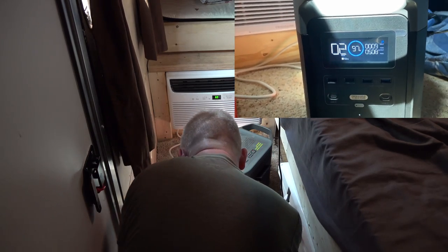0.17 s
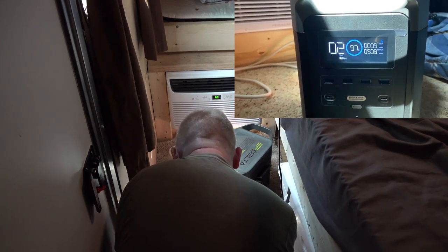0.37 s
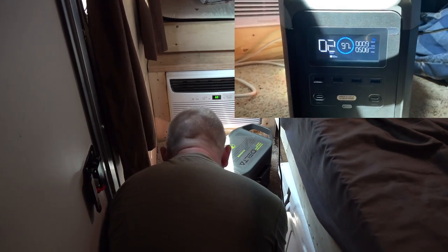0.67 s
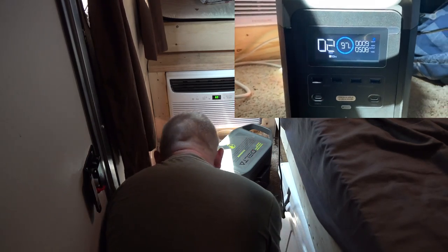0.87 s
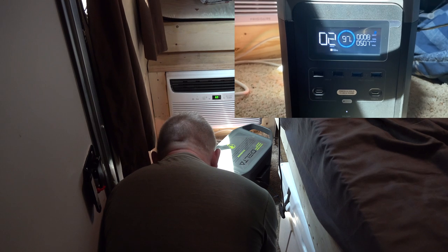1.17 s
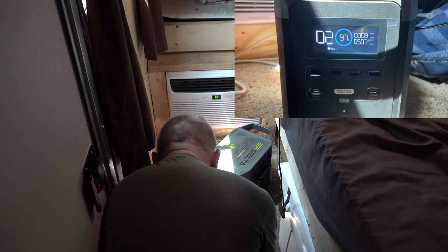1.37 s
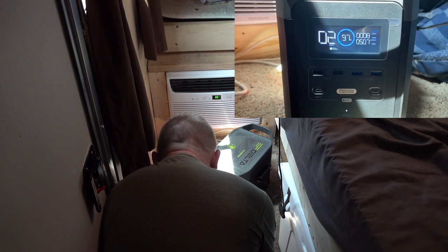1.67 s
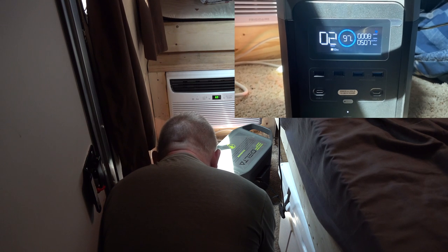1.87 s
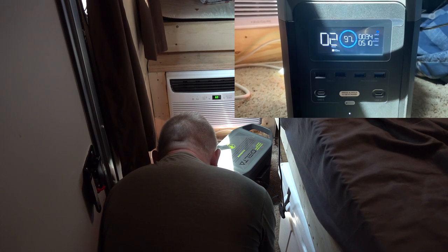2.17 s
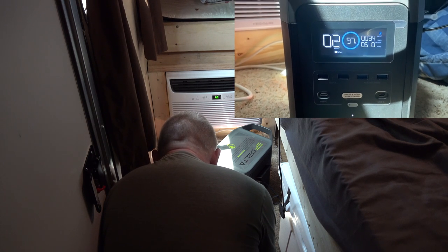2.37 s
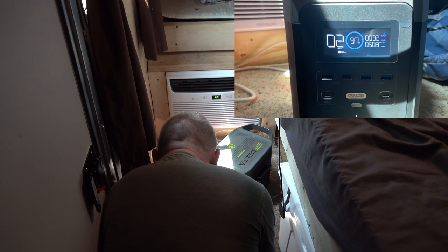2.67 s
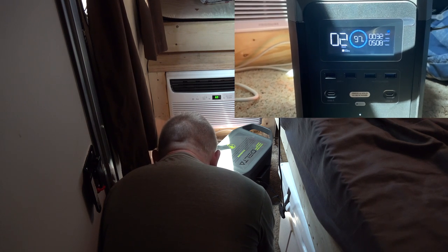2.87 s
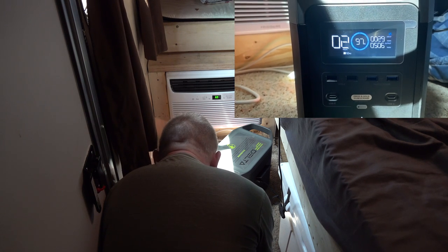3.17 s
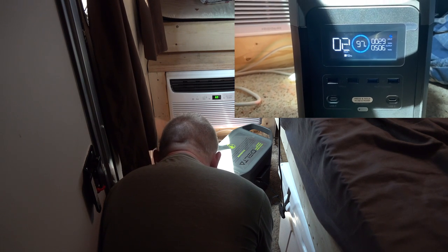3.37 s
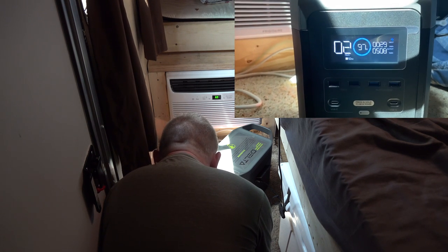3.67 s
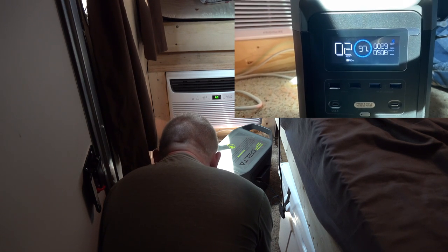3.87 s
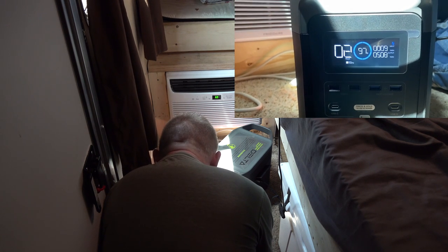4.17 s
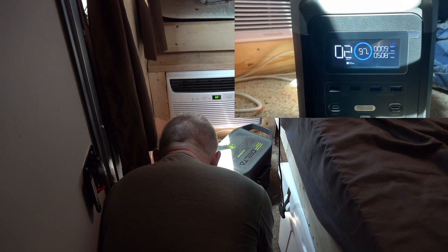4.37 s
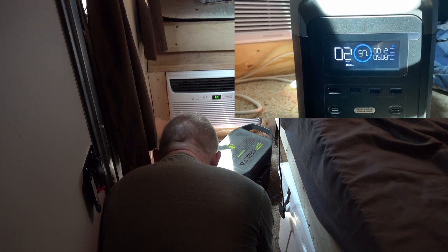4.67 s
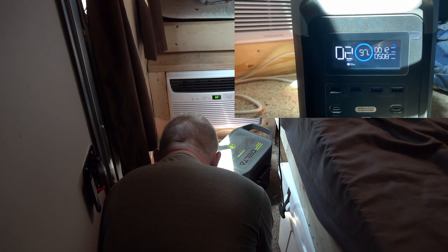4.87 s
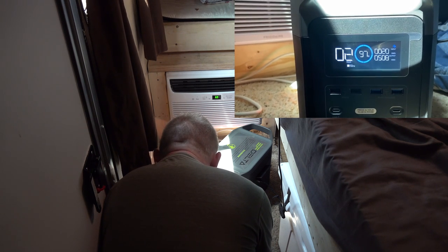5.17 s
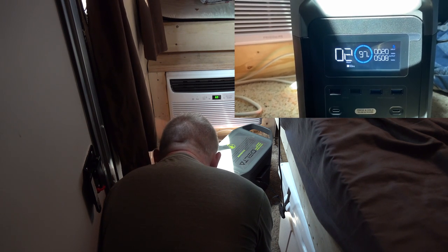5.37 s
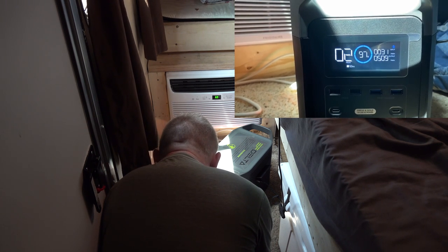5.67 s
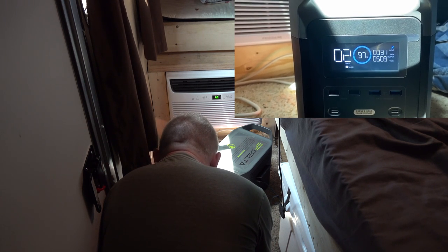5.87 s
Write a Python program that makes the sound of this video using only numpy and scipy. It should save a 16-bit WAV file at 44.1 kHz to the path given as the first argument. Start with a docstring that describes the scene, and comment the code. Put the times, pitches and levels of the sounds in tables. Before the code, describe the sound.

A wall air conditioner runs steadily in a small camper, blower air rushing over a low boom with humming, buzzing motor tones.

```python
"""Air conditioner in a small camper

A wall air conditioner runs steadily, heard from a phone a couple of metres away. Filtered noise makes the
blower air that rushes through the grille and booms low down; fluttering sines make the tones of fan,
compressor, mains hum and thin whines. One faint tick comes from the plastic casing. A faint deep rumble,
swelling with two jolts of the phone early on, dies away after two seconds."""
import sys
import numpy as np
from scipy import signal
from scipy.fft import rfft, irfft
from scipy.io import wavfile
from scipy.ndimage import uniform_filter1d

SR = 44100
rng = np.random.default_rng(int(sys.argv[2]) if len(sys.argv) > 2 else 0)


def to_wav(sig):
    """Store sig (one row per channel, or 1-D mono) as 16-bit WAV at the path in sys.argv[1].

    Samples outside -1..1 are clipped; the rate is SR.
    """
    pcm = np.clip(np.atleast_2d(sig), -1, 1) * 32767
    pcm = np.round(pcm).astype(np.int16)
    wavfile.write(sys.argv[1], SR, pcm.T)  # frames by channels


N = 266319  # length in samples, about 6 s

TIME = np.arange(N) / SR  # s
FREQ = np.maximum(np.arange(N // 2 + 1) * SR / N, 1)  # Hz, kept above zero for the logarithm


def undb(db):
    """Decibels to gain."""
    return 10 ** (np.asarray(db) / 20)


def curve(rows):
    """A table of (s, value) joined by straight lines over time."""
    return np.interp(TIME, *np.transpose(rows))


def spectrum(rows):
    """A table of (Hz, value) joined on a log-frequency axis."""
    hz, value = np.transpose(rows)
    return np.interp(np.log(FREQ), np.log(hz), value)


def shape(x, gain):
    """Filter with one gain per frequency."""
    return irfft(rfft(x) * gain, N)


def noise(gain):
    """Noise whose amplitude per root Hz is gain."""
    return shape(rng.standard_normal(N), gain) * np.sqrt(SR / 2)


def below(hz, order):
    """Gain of a smooth low-pass."""
    return 1 / np.sqrt(1 + (FREQ / hz) ** (2 * order))


def walk(rate):
    """Smooth random motion with unit spread, holding rates up to about rate Hz."""
    x = noise(below(rate, order=3))
    return x / x.std()


def turns(hz, drift):
    """Phase of a rotation whose speed wanders by the share drift."""
    speed_hz = hz * (1 + drift * walk(0.95))
    return 2 * np.pi * np.cumsum(speed_hz) / SR


def tone(phase, db, flutter, rate):
    """One partial at an RMS level of db; moving air makes its strength and phase flutter."""
    path = 1 + flutter * (walk(rate) + 1j * walk(rate)) / np.sqrt(2)
    start = rng.uniform(0, 2 * np.pi)
    amplitude = undb(db) * np.sqrt(2 / (1 + flutter ** 2))  # flutter leaves the level alone
    return amplitude * np.real(path * np.exp(1j * (phase + start)))


def machine(rows, phase, flutter, rate):
    """Partials locked to whole multiples of one rotation."""
    return sum(tone(round(multiple) * phase, db, flutter, rate) for multiple, db in rows)


def rumble(jolt_db, corner_hz=10):
    """Mostly subsonic rumble: it swells with each jolt of the phone and dies away after two seconds."""
    # jolts of the phone in the hand: peak_s, level_db, half_length_s
    jolt_table = [(.17, -31.5, 0.12), (.6, -30, 0.13)]
    steady_db, fade_s, settle_s = -43.5, 2.0, .22  # a faint steady rumble that dies away after two seconds
    x = noise(below(corner_hz, order=2) * below(34, order=4) * (1 - below(6, order=3)))
    x = x / np.sqrt(uniform_filter1d(x ** 2, size=SR // 4))  # even out the level
    held = undb(steady_db) * np.exp(-np.maximum(TIME - fade_s, 0) / settle_s)
    jolts = sum(undb(db + jolt_db) * np.exp(-((TIME - peak_s) / half_s) ** 2)
                for peak_s, db, half_s in jolt_table)
    return x * np.hypot(held, jolts)


def ticks(decay_s=.004):
    """A short, damped noise burst around one resonance of the plastic casing."""
    # faint ticks: start_s, level_db, resonance_hz
    tick_table = [(.634, -39, 1950)]
    out = np.zeros(N)
    for start_s, db, hz in tick_table:
        ring = noise(1 / (1 + ((FREQ - hz) / (.25 * hz)) ** 2))
        envelope = np.exp(-np.abs(TIME - start_s) / decay_s) * (TIME >= start_s)
        out += ring / ring.std() * undb(db) * envelope
    return out


def reflections(depth=0.13, decay_s=0.013):
    """Gain of dense echoes from the close walls, which comb the treble finely."""
    echoes = rng.standard_normal(N) * np.exp(-TIME / decay_s) * (TIME > .004)
    comb = rfft(echoes) / np.sqrt(np.sum(echoes ** 2))
    share = depth * (1 - below(1350, order=4))
    return np.abs(1 + share * comb) / np.sqrt(1 + share ** 2)


def cabin_db():
    """Peaks and dips in dB that the duct and the close walls give to the rush."""
    # resonances (+) and cancellations (-) of duct and cabin: centre_hz, width_hz, gain_db
    cabin = [(81.3, 19, -12), (138.4, 8, -1.5), (158.6, 15.5, 9), (184, 14, -4.5), (198, 7.3, 2),
             (216.5, 8.4, -4.5), (291, 29, 3.5), (335, 20, -1), (361, 11, 3), (389, 16, -5.5),
             (418, 22, 2.5), (482, 44, -3), (546, 54, 3), (657, 30, 2), (715, 28, -9), (789, 87, 5),
             (1102, 13, -2.5), (1116, 30, 5.5), (1392, 74, 4), (1830, 400, 4), (2240, 106, -1.7),
             (2431, 290, 5), (2740, 261, -3.0), (3825, 180, 3.0), (4515, 217, 1.7), (6160, 680, 2),
             (8660, 460, 2.5), (9900, 596, 2)]
    return sum(db / (1 + (2 * (FREQ - hz) / width_hz) ** 2) for hz, width_hz, db in cabin)


def motors():
    """The fan drones, the compressor buzzes just under mains speed, the windings hum and whine."""
    fan_hz, compressor_hz, mains_hz = 18.33, 58.55, 60
    # fan tones: shaft_multiple, level_db
    fan_tones = [(1, -49), (3, -49.5), (4, -44), (8, -45.5)]
    # compressor tones: shaft_multiple, level_db
    compressor_tones = [(1, -56.5), (3, -51), (4, -55), (5, -54.5), (10, -68.5), (12, -59.5), (13, -48.5),
                        (14, -53.5), (15, -56), (16, -54), (17, -58.5), (19, -61.5), (21, -67), (26, -66.5)]
    # magnetic hum of the motors: mains_multiple, level_db
    hum_tones = [(2, -45), (4, -46)]
    # thin motor whines: pitch_hz, level_db
    whine_tones = [(598.2, -54), (1674, -60.5), (2435, -58), (4860, -68), (6032, -74), (7027, -81)]
    fan = machine(fan_tones, turns(fan_hz, drift=.001), flutter=0.099, rate=2.3)
    compressor = machine(compressor_tones, turns(compressor_hz, drift=0.00032), flutter=0.38, rate=3.1)
    hum = machine(hum_tones, turns(mains_hz, drift=0.00012), flutter=0.53, rate=2.56)
    whines = sum(tone(turns(hz, drift=0.000413), db, flutter=0.51, rate=6) for hz, db in whine_tones)
    return fan + compressor + hum + whines


def blower(colour, throb_db=1.27, throb_rate=6, flicker_db=0.29):
    """Turbulent air as filtered noise: a throbbing boom low down, an even rush, and hiss at the grille."""
    # slow drift of the low boom: time_s, level_db
    boom_drift = [(0, -37.5), (.4, -34), (1.1, -37), (1.6, -41), (2.8, -36), (4.1, -37.8), (6.04, -36.5)]
    # rise and fall of the treble, used relative to its mean: time_s, level_db
    treble_level = [(0.03, -47.5), (0.16, -46), (1.44, -47), (2.12, -46), (2.36, -47), (6.0, -47)]
    air = noise(colour)
    boom = shape(air, below(190, order=12) * (1 - below(125, order=12)))
    hiss = shape(air, 1 - below(3000, order=2))
    rush = air - boom - hiss
    # flatten the noise band's own slow beating so that the boom follows the drift curve
    slow = np.sqrt(uniform_filter1d(boom ** 2, size=SR // 2))
    # a random walk adds faster throbbing to the boom
    boom = boom / slow * undb(curve(boom_drift) + throb_db * walk(throb_rate))
    treble = curve(treble_level)
    hiss_db = treble - treble.mean() + flicker_db * walk(9.4)
    return rush + boom + hiss * undb(hiss_db)


def scene():
    """The side noise nearly vanishes from 1 to 5 kHz, so the sound is almost mono there, and wider below and
    above."""
    # rush of the blower air before cabin and echoes: frequency_hz, level_db_per_hz
    air_rows = [(20, -66), (50, -63), (85, -62), (115, -56.5), (200, -62), (380, -68.5), (600, -64),
                (900, -69.0), (1250, -78.5), (2400, -81), (4600, -83), (7800, -91.5), (11000, -101.7),
                (15500, -105.5)]
    # level of the side noise against the rush: frequency_hz, relative_level_db
    side_level = [(25, -11), (60, -17), (150, -24), (400, -20), (750, -29.5), (1200, -56), (3000, -48.5),
                  (5000, -42), (6200, -8), (8500, -11), (11000, -3), (15000, -1)]
    # the right microphone is louder in the bass, the left one leads:
    # frequency_hz, left_minus_right_db, left_lead_radians
    port_rows = [(25, 0, .1), (70, -3, 0.14), (120, -1.6, 0.22), (250, -.6, 0.13), (600, -0.1, 0.1),
                 (1000, 0, 0)]
    colour = undb(spectrum(air_rows) + cabin_db()) * reflections()
    mid = blower(colour) + motors() + ticks() + rumble(jolt_db=0)
    side = noise(colour * undb(spectrum(side_level))) + rumble(jolt_db=-6)
    ports = np.array(port_rows)
    balance_db, lead = spectrum(ports[:, [0, 1]]), spectrum(ports[:, [0, 2]])
    left = undb(balance_db / 2) * np.exp(1j * lead / 2)  # each side takes half the difference
    return np.array([shape(mid, left) + side, shape(mid, 1 / left) - side])


def record(dry):
    """The phone cuts the top steeply, here with an elliptic low-pass."""
    top_hz = 15730
    return signal.sosfilt(signal.ellip(12, .1, 90, top_hz, fs=SR, output="sos"), dry)


dry = scene()
out = record(dry)
to_wav(out)
```